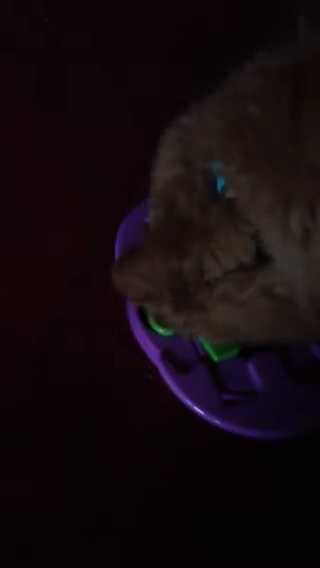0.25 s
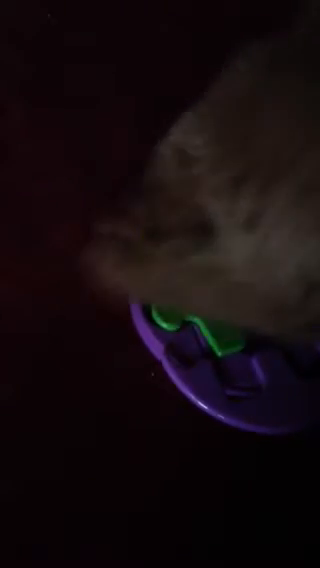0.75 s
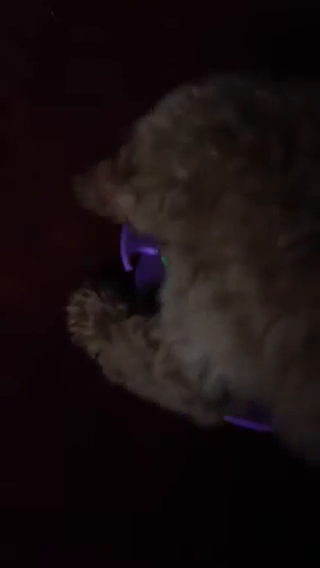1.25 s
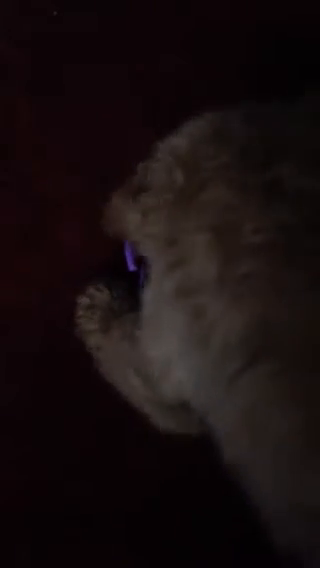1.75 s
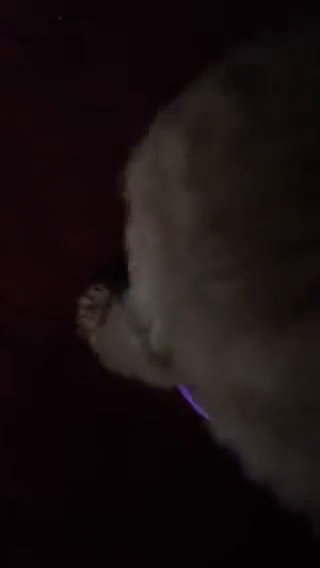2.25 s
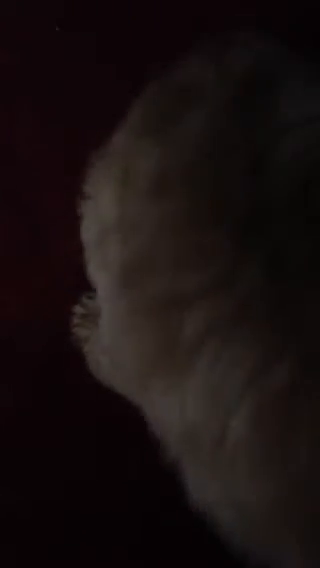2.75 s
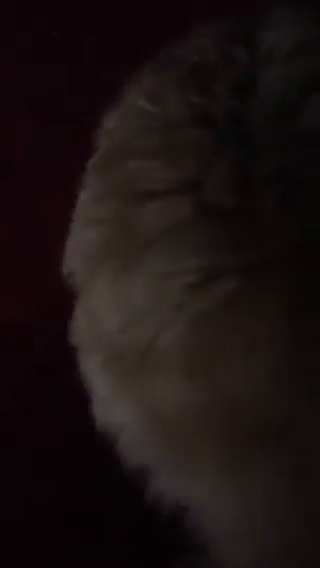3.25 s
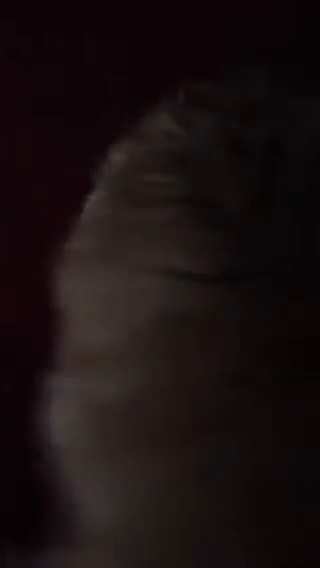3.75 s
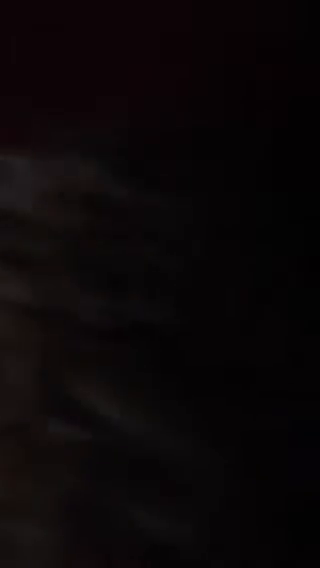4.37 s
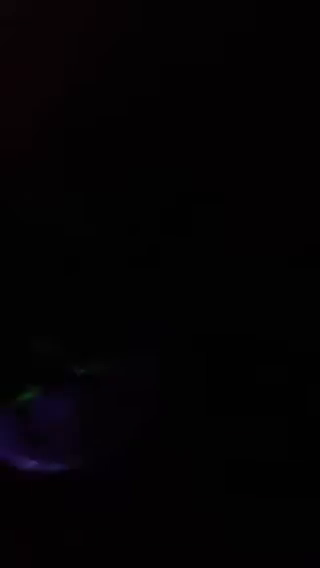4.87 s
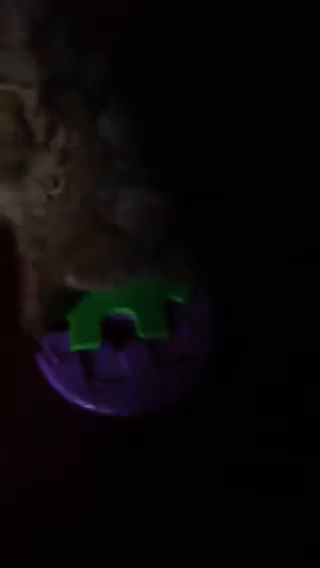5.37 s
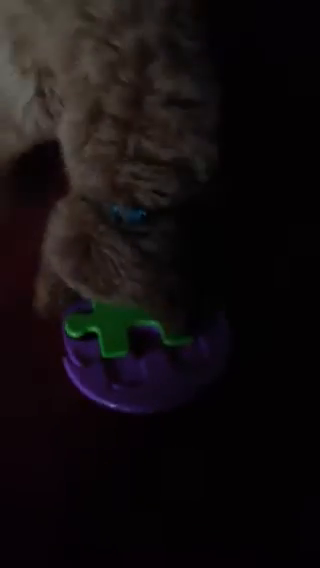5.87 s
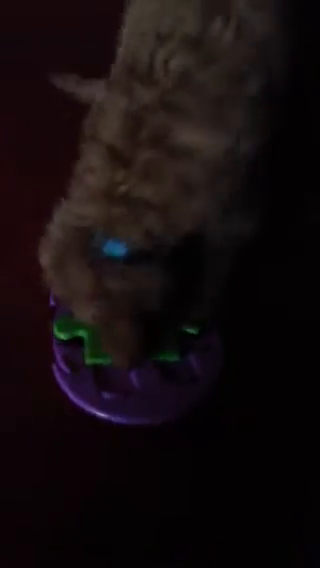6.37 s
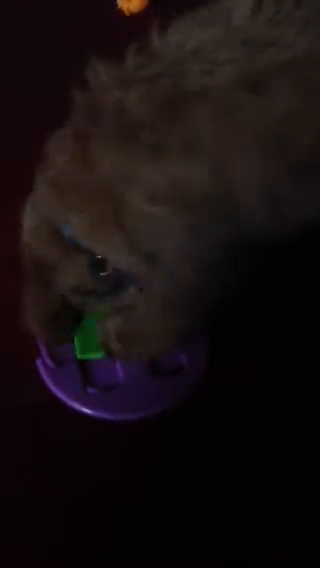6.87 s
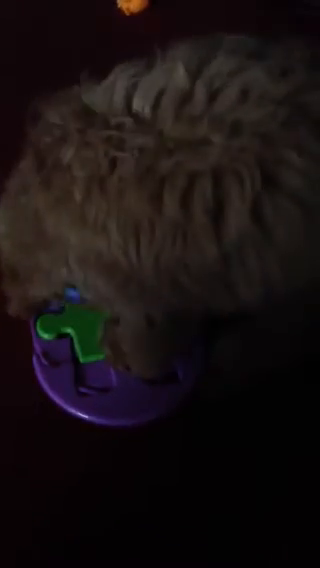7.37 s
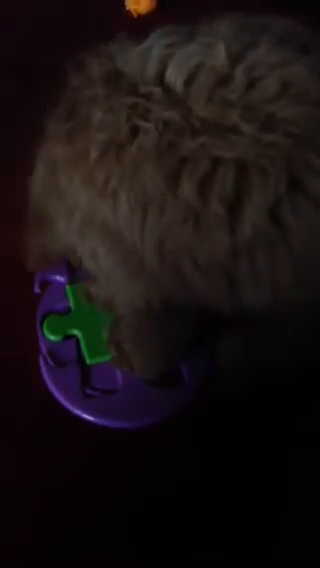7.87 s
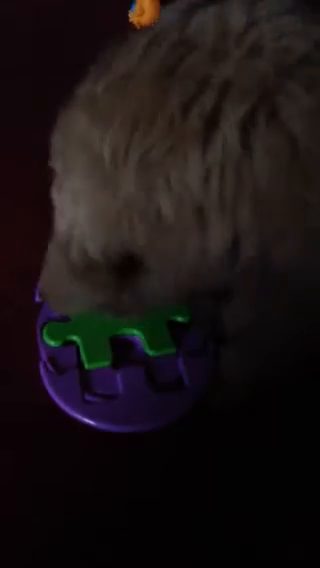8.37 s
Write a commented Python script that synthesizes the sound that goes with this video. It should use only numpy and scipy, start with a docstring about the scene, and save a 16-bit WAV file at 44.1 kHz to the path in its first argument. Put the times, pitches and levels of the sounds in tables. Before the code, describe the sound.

Hollow plastic clacks and sliding rattles come in a busy burst, then thin out to separate sharp clicks, with soft sniffs and paw thuds.

```python
"""Two faint rubbing squeaks open the scene, then soft knocks, a paw thud and a sniff, over room air and mains hum.
A dog noses and paws a hollow plastic puzzle toy on a carpet in a quiet room, near a phone.
Loose pieces knock, rattle and slide: noise contacts and slip grains ring the modes of one plastic tray.
Squeaks are noise in a narrow resonance, sniffs are coloured air noise, tag and paws are decaying sines.
A short echo surrounds the toy; deep bass is thin, treble much weaker above 15.4 kHz and absent above 16.5 kHz."""
import sys
import numpy as np
from scipy import signal
from scipy.fft import rfft, irfft, next_fast_len
from scipy.io import wavfile
from scipy.ndimage import uniform_filter1d

SR = 44100
rng = np.random.default_rng(int(sys.argv[2]) if len(sys.argv) > 2 else 0)


def wav_out(sig):
    """Save sig, one row per channel (or a flat mono array), as 16-bit PCM at SR to the path in sys.argv[1]."""
    wavfile.write(sys.argv[1], SR, np.round(np.clip(np.atleast_2d(sig).T, -1, 1) * 32767).astype(np.int16))


N = 380141  # samples


def gain_of(db):
    """Decibels to amplitude."""
    return 10 ** (np.asarray(db) / 20)


def evened(x):
    """Scales to rms 1."""
    return x / np.sqrt(np.mean(x ** 2) + 1e-20)


def read(points, hz):
    """Reads a spectrum on a log-frequency axis."""
    f, value = np.transpose(points)
    return np.interp(np.log(hz + 1), np.log(f + 1), value)


def add(mix, s, sound):
    """Mixes a sound in at s seconds."""
    part = mix[max(round(s * SR), 0):][:len(sound)]
    part += sound[:len(part)]


def coloured(x, points):
    """Filters by a spectrum."""
    size = next_fast_len(len(x))
    gains = gain_of(read(points, np.fft.rfftfreq(size, 1 / SR)))
    return irfft(rfft(x, size) * gains, size)[:len(x)]


def ring(x, hz, width):
    """A mode with gain near 1 at its centre and steep skirts: a narrow and a wide two-pole stage."""
    for spread in (1, 5.0):
        r = np.exp(-np.pi * width * spread / SR)
        x = signal.lfilter([1 - r, 0, r - 1], [1, -2 * r * np.cos(2 * np.pi * hz / SR), r * r], x)
    return x


def wander(per_s):
    """Slow random drift of rms 1, with per_s new targets a second."""
    steps = rng.standard_normal(round(N / SR * per_s) + 2)
    return evened(np.interp(np.arange(N) / SR * per_s, np.arange(len(steps)), steps))


def played(rows, rise, sag, fall):
    """Each row swells in, sags while held and dies away (dB per s): summed gain and gain-weighted colour."""
    t = np.arange(0, N + 64, 64) / SR
    start, hold, db, colour = np.transpose(rows)[:, :, None]
    held = np.clip(t - start, 0, hold)
    before = np.maximum(start - t, 0)
    after = np.maximum(t - start - held, 0)
    gains = gain_of(db - rise * before - sag * held - fall * after)
    total = gains.sum(axis=0)
    blend = (gains * colour).sum(axis=0) / (total + 1e-30)
    return [np.interp(np.arange(N) / SR, t, curve) for curve in (total, blend)]


# Clear knocks of pieces on the tray. Each row: start in seconds, level of the body's loudest moment in dB,
# hardness as treble in dB against the body, frequency that the struck spot favours in Hz.
KNOCKS = [(.0978, -35.5, -17, 1003), (.1188, -42, -25, 1070), (.132, -40, -34, 1000),
          (.6382, -51, -29.5, 1030), (.809, -57, -20, 1460), (.884, -34.5, -28, 1570),
          (.8986, -31.5, -7.5, 3220), (.914, -36, -8, 1390), (.9286, -31, -18, 1550),
          (.9528, -40.5, -4, 1630), (.981, -35, -15, 3150), (.9903, -44.5, -1, 3000),
          (1.0525, -42, -22, 1600), (1.0844, -42.5, -34, 1120), (1.2664, -35, -16, 1500),
          (1.284, -57, -26, 1140), (1.304, -46, 3.5, 1300), (1.3894, -26, -6, 1160),
          (1.4137, -26.5, -3, 1650), (1.4274, -20, -8.5, 2160), (1.4738, -26, 0.5, 1150),
          (1.5043, -25, -3, 1590), (1.5376, -22, -10.5, 960), (1.569, -22.5, -10, 980),
          (1.5802, -19.5, -7, 1640), (1.5953, -19, -8.5, 1690), (1.6285, -43, -18.5, 1930),
          (1.6783, -32, -28, 1100), (1.7322, -28.5, -19, 1440), (1.7828, -27.5, -3, 1460),
          (1.7965, -14, -5, 1490), (1.8681, -26.5, -10, 1700), (1.9023, -22.5, -32, 1240),
          (1.9265, -23.5, -8.5, 1220), (1.9554, -27, 2, 2080), (1.9874, -20, -5, 1490),
          (2.0032, -20, -12, 1170), (2.0139, -24, 0.5, 2720), (2.0199, -19.5, -3, 1580),
          (2.1093, -34, 1.5, 1680), (2.1226, -23.5, -42, 1560), (2.1993, -20, -50, 1480),
          (2.2205, -28, -8.5, 2020), (2.2553, -38, -15, 1260), (2.3157, -34.5, -6.5, 1020),
          (2.3436, -35, -38, 1730), (2.399, -24, -6.5, 3220), (2.4392, -25.5, -38, 1560),
          (2.4749, -35, -16, 1470), (2.6314, -33.5, -23, 1040), (2.666, -31, -9, 960),
          (2.677, -32, -26, 1350), (2.7802, -27.5, -22.5, 1200), (2.827, -37, -32, 1450),
          (2.8402, -39.5, -32, 1520), (2.855, -35.5, -14, 930), (2.8954, -36, -30.5, 1560),
          (2.9159, -30.5, -31, 1240), (2.939, -18, 2, 2270), (2.9644, -36, -4, 1780),
          (3.283, -45.5, -21, 1500), (3.2906, -39, -4.5, 4460), (3.3924, -34.5, -9.5, 1700),
          (3.4546, -27.5, -16.5, 794), (3.48, -26.5, -27.5, 1460), (3.4895, -22.5, -2.5, 1230),
          (3.5141, -14.5, -5.5, 1560), (3.5534, -32.5, 2.5, 2120), (3.5796, -27, -5, 860),
          (3.605, -29.5, -26, 1700), (3.7037, -45.5, -26, 860), (3.72, -44, -35, 990),
          (3.7342, -35, -13, 1190), (3.819, -37, -33, 1440), (3.8337, -31, -14, 1320),
          (3.8904, -26, -1, 3790), (3.9272, -26, -3, 1400), (3.9985, -34.5, -13, 1450),
          (4.0429, -38, -21, 1310), (4.0515, -33, -11, 1370), (4.0816, -38, -15.5, 1670),
          (4.655, -46, -19, 1518), (4.697, -44.5, -21.5, 1410), (4.9652, -34.5, -13, 1240),
          (5.1457, -35, -30.5, 1050), (5.1692, -34.5, -28, 1190), (5.1941, -13, -3, 1910),
          (5.2073, -15, -4.5, 1890), (5.24, -20.5, -29, 1610), (5.2496, -18.5, -3, 2010),
          (5.2742, -35, -11, 2040), (5.2917, -30, -9, 1500), (5.4507, -43, -14, 1630),
          (5.4759, -43.5, -28, 1040), (5.588, -37, -16, 1740), (5.6918, -51, -6.5, 1970),
          (5.8035, -36, -5.5, 1330), (5.8329, -25, -1.5, 1360), (5.8511, -30.5, -19, 1510),
          (5.9241, -21.5, -5, 1340), (5.9414, -34, -16, 1300), (5.9797, -37, -30, 1230),
          (6.01, -41.5, -12, 1510), (6.2434, -52, -31.5, 750), (6.3613, -41, -12, 1260),
          (6.403, -31.5, -8, 1470), (6.425, -42, -3.5, 1400), (6.44, -43, -33, 1500),
          (6.5752, -28.5, -49, 1600), (6.5964, -34.5, -17, 1410), (6.6192, -36, 1.5, 1520),
          (6.6971, -27, 2.5, 3840), (6.7055, -23.5, 1.5, 1180), (6.7225, -16, -3, 2010),
          (6.7658, -28, -8.5, 1260), (6.7865, -35.5, -24, 1260), (6.8752, -37, -50, 1670),
          (7.0208, -47, -26.5, 1690), (7.137, -32.5, -1, 2260), (7.1529, -11, -2.5, 2180),
          (7.171, -32, -12.5, 3900), (7.312, -52, -5, 900), (7.547, -52, -20, 800),
          (7.556, -38, -30.5, 1270), (7.577, -39, -28, 1590), (7.649, -51, -30.5, 1750),
          (7.68, -54, -17.5, 2056), (7.829, -53.5, -19.5, 972), (7.952, -54.5, -10.5, 1335),
          (8.0621, -39.5, 3, 1648), (8.109, -41.5, -1.5, 1160), (8.1662, -50, -17, 3110),
          (8.2118, -20, -7, 1400), (8.2575, -22, -8, 1740), (8.2946, -28, -35, 1660),
          (8.3249, -36, -12, 1680), (8.3384, -38, -2, 1300), (8.3512, -42, 7, 970), (8.372, -37, -6, 1300),
          (8.4245, -45, -18, 3120), (8.467, -46, -10.5, 3060)]
# Resonances of the plastic tray, lowest first. Each row: frequency in Hz, width in Hz, level in dB.
TRAY_MODES = [(478, 140, 0), (687, 450, 5.5), (900, 330, -0.5), (1120, 230, 4.5), (1300, 200, 4),
              (1450, 120, 3), (1640, 352, 4), (1970, 200, -6.5), (2192, 460, -2.5), (2560, 220, -10),
              (2804, 460, -2.5), (3137, 250, -4.5), (3563, 430, -8.5), (4470, 130, -13), (5030, 270, -14.5)]
# Treble spectrum of a hard contact. Each row: frequency in Hz, level in dB per Hz.
CRACK = [(2350, -27), (4000, 4), (7090, -3.5), (8770, -8.5), (9410, -8), (12900, -10.5), (14600, -15.5),
         (16400, -28)]
WEIGHT_DB = -13.5  # bass of a knock against its body, for a spot at 1400 Hz
WEIGHT_DB_PER_OCTAVE, WEIGHT_SPREAD_DB = -4, 2.5  # low spots sound heavier


def knocks(rows):
    """Each knock is a quick chatter of contacts that rings the tray where it lands."""
    out, t = np.zeros(N), np.arange(2048) / SR
    for s, db, hard_db, spot_hz in rows:
        if db < -62:  # too faint to hear
            continue
        chatter_s = 0.0046 * gain_of(0.14 * (db + 29.5))  # stronger blows chatter longer
        contacts = rng.standard_normal(len(t)) * gain_of(6.1 * rng.standard_normal(len(t)))
        contacts *= np.minimum(t / (0.17 * chatter_s), 1) * np.exp(-t / chatter_s)
        luck_db = 2 * rng.standard_normal(len(TRAY_MODES))
        heavy_db = WEIGHT_DB + WEIGHT_DB_PER_OCTAVE * np.log2(spot_hz / 1400)
        heavy_db += WEIGHT_SPREAD_DB * rng.standard_normal()

        # modes near the struck spot are driven hardest; a strong blow shakes more of the tray
        focus_db = np.clip(5.5 - 0.16 * (db + 19.5), 2, 14)  # per octave
        octaves = abs(np.log2(np.transpose(TRAY_MODES)[0, 1:] / spot_hz))
        # a light tap sings on the nearest mode
        nearest_db = np.clip(-.25 * (db + 10), 0, 7) * (octaves == octaves.min())
        body = np.zeros(len(t))
        for (hz, width, mode_db), luck, octave, near in zip(TRAY_MODES[1:], luck_db, octaves, nearest_db):
            body += gain_of(mode_db + luck - focus_db * octave + near) * ring(contacts, hz, width)

        crack = coloured(contacts, CRACK)
        weight = ring(contacts, *TRAY_MODES[0][:2])
        for part, part_db in ((body, 0), (crack, hard_db), (weight, heavy_db)):
            loudest = np.sqrt(uniform_filter1d(part ** 2, size=110).max() * 2)
            add(out, s, gain_of(db + part_db) * part / loudest)
    return out


# Pieces scraping over the tray, and among them a few very faint rustles. Each row: start in seconds,
# hold in seconds, scraping level at the start in dB, treble in dB against it.
SCRAPES = [(.11, 0.036, -57, -29), (.885, 0.1, -45.5, -31), (1.272, 0.014, -44.5, -26),
           (1.39, 0.12, -29.5, -27), (1.52, 0.12, -29, -37), (1.74, 0.034, -37.5, -13.5),
           (1.79, 0.085, -33.5, -37), (1.89, 0.26, -29.5, -15), (2.11, 0.036, -37.5, -7.5),
           (2.2, 0.067, -35, -8), (2.32, 0.038, -38, -36), (2.41, 0.034, -29.5, -54),
           (2.63, 0.076, -42, -34), (2.78, 0.19, -50.5, -14.5), (2.912, 0.025, -34.5, -10),
           (2.94, 0.013, -32, -2), (3.29, 0.0073, -57, -32), (3.457, 0.04, -44, -25),
           (3.495, 0.063, -27.5, -10), (3.73, 0.015, -45, -32), (3.82, 0.41, -48.5, -20),
           (4.66, 0.076, -70, -25.5), (4.97, .005, -54, -32), (5.15, .04, -47, -8), (5.2, 0.054, -40.5, -4),
           (5.4, 0.59, -57, -28), (5.68, 0.16, -71.5, -14.5), (5.836, 0.026, -42, -15),
           (5.93, 0.011, -37.5, -24), (6.24, 0.16, -65.5, -13), (6.36, 0.099, -53.5, -37),
           (6.58, 0.037, -46.5, -28), (6.706, 0.035, -34.5, -17), (6.83, 0.067, -61, -14),
           (7.02, 0.09, -65, -16.5), (7.155, 0.0075, -34.5, -25), (7.27, 0.16, -62, -11),
           (7.56, 0.027, -53, -23), (8.06, 0.074, -61, -18), (8.212, 0.071, -36, -49),
           (8.33, 0.023, -33, -28.5), (8.43, 0.33, -55, -11)]
SCRAPE_RISE, SCRAPE_SAG, SCRAPE_FALL = 2500, 50, 367  # dB per s before, during and after the hold


def drags():
    """Stick and slip: uneven grains, in clumps, ring the same tray."""
    gain, treble_db = played(SCRAPES, SCRAPE_RISE, SCRAPE_SAG, SCRAPE_FALL)
    grains = gain_of(3.0 * np.minimum(rng.exponential(1, N), 3.5)) * rng.choice([-1., 1.], N)
    grains *= rng.random(N) < 2500 / SR  # about 2500 slips a second
    grains = evened(grains * gain_of(3.4 * wander(120)))
    # the sliding contact visits one mode after another
    body = np.zeros(N)
    for hz, width, db in TRAY_MODES:
        visit = gain_of(db + 2.5 * np.log2(hz / 1500) + 4.1 * wander(60))
        body += ring(visit * grains, hz, width)
    treble = evened(coloured(grains, CRACK))
    return gain * (evened(body) + gain_of(treble_db) * treble)


RATTLE_PER_S = 26
RATTLE_DB, RATTLE_SPREAD_DB = -3.5, 6  # small knocks, against the scraping level
RATTLE_HARD_DB, RATTLE_HZ = -16.5, 1400  # typical treble against the body, and favoured spot


def rattle():
    """Rows of small knocks at random moments, their strength following the scraping level."""
    slots = np.arange(int(N / SR * RATTLE_PER_S))
    s = (slots + rng.random(len(slots))) / RATTLE_PER_S
    size, hard, spot = rng.standard_normal((len(slots), 3)).T
    scrape = played(SCRAPES, SCRAPE_RISE, SCRAPE_SAG, SCRAPE_FALL)[0]
    scrape_db = 20 * np.log10(scrape[(s * SR).astype(int)] + 1e-9)
    level_db = scrape_db + RATTLE_DB + RATTLE_SPREAD_DB * size
    return np.transpose([s, level_db, RATTLE_HARD_DB + 7.0 * hard, RATTLE_HZ * 2 ** (0.29 * spot)])


# A rubbed piece sings briefly on one note. Each row: start in seconds, length in seconds,
# rms level in dB before the ends are faded, frequency in Hz.
SQUEAKS = [(0, 0.036, -64, 1000), (0, 0.04, -64, 2400), (0.206, 0.074, -61, 1450),
           (.89, 0.043, -47.5, 3200), (0.978, .03, -49, 3130), (1.148, 0.053, -53.5, 1600),
           (2.992, 0.031, -47, 1570), (5.857, 0.078, -51, 1400), (8.255, 0.025, -36, 1690)]
SQUEAK_WIDTH_HZ = 120


def squeaks():
    """Friction noise held by one narrow resonance."""
    out = np.zeros(N)
    for s, length, db, hz in SQUEAKS:
        rub = rng.standard_normal(round(length * SR))
        note = evened(ring(rub, hz, SQUEAK_WIDTH_HZ))
        add(out, s, gain_of(db) * note * signal.windows.tukey(len(rub), .5))
    return out


# Air through the dog's nose. Each row: start in seconds, hold in seconds, level at the start in dB,
# dullness as dB lost per octave above 3 kHz.
SNIFFS = [(.135, 0.12, -55, -0.5), (.41, 0.027, -82.5, 13), (.72, 0.047, -68.5, 6), (1.13, 0.42, -60, 0),
          (4.43, 0.093, -76.5, -4), (4.69, 0.024, -56, -1), (5.34, 0.34, -64, -3.5),
          (8.49, 0.063, -58.5, -1)]
# Spectrum of the nose air. Each row: frequency in Hz, level in dB per Hz.
NOSTRILS = [(290, -34), (500, -10.5), (827, -10), (901, -3.5), (1560, 0), (2100, -15.5), (2290, -11),
            (4130, -10.5), (15500, -24)]
SNIFF_RISE, SNIFF_SAG, SNIFF_FALL = 360, 23, 800  # dB per s before, during and after the hold


def sniffs():
    """Turbulent air, slightly fluttering; a nose turned into the toy sounds duller."""
    gain, dull = played(SNIFFS, SNIFF_RISE, SNIFF_SAG, SNIFF_FALL)
    air = evened(coloured(rng.standard_normal(N), NOSTRILS) * gain_of(3.7 * wander(48)))
    hz, t, z = signal.stft(air, SR, nperseg=256)
    octaves = np.log2(np.maximum(hz, 3000) / 5000)[:, None]  # the tilt pivots at 5 kHz
    z = z * gain_of(-octaves * dull[np.minimum((t * SR).astype(int), N - 1)])
    return gain * signal.istft(z, SR, nperseg=256)[1][:N]


# Modes of the metal tag. Each row: frequency in Hz, level in dB, time to fall 60 dB in seconds.
TAG_MODES = [(8500, -9, .06), (10330, -8, .047), (11775, -5.5, .088), (15085, -2.5, .061)]
# The tag swings against its ring. Each row: start in seconds, level in dB before the mode levels,
# frequency that the touch favours in Hz.
TINKLES = [(0.777, -58, 10300), (1.022, -55, 10400), (5.843, -36, 9800), (6.611, -36.5, 15000),
           (6.62, -18.5, 12800), (6.623, -30, 13000)]


def tag():
    """Thin metal: a few clean high modes, weaker the further they lie from the favoured frequency."""
    out, t = np.zeros(N), np.arange(8000) / SR
    for s, db, spot_hz in TINKLES:
        for hz, mode_db, t60 in TAG_MODES:
            off_spot_db = 22.0 * abs(np.log2(hz / spot_hz))
            level = gain_of(db + mode_db - off_spot_db - 60 * t / t60)
            add(out, s, level * np.sin(2 * np.pi * hz * t) * np.minimum(t / 0.0017, 1))
    return out


# Paws landing on the carpet. Each row: start in seconds, level at the start of the decay in dB,
# frequency in Hz, time to fall 60 dB in seconds.
THUDS = [(0.094, -40, 132, 0.044), (0.884, -40, 158, 0.042), (1.038, -47, 101, 0.07),
         (1.118, -50.5, 100, 0.14), (1.383, -32, 163, 0.047), (1.795, -36, 180, 0.1),
         (2.311, -36.5, 197, 0.075), (3.455, -50.5, 171, 0.56), (5.192, -37.5, 198, 0.1),
         (5.554, -40.5, 151, 0.11), (6.713, -29, 208, 0.071), (6.952, -31.5, 294, 0.03),
         (6.953, -32.5, 80, 0.077), (6.973, -29, 94, 0.11), (7.144, -44, 209, 0.076),
         (8.217, -41, 206, 0.1)]


def paws():
    """Soft low pushes into the floor: decaying sines with a short rise."""
    out, t = np.zeros(N), np.arange(9000) / SR
    for s, db, hz, t60 in THUDS:
        level = gain_of(db - 60 * t / t60)
        add(out, s, level * np.sin(2 * np.pi * hz * t) * np.minimum(t / 0.0013, 1))
    return out


# Decay of the room echo. Each row: frequency in Hz, time to fall 60 dB in seconds.
ROOM_DECAY = [(200, .2), (1000, 0.18), (4000, 0.19), (12000, 0.19)]
ROOM_DB = -12  # echo against the near sound


def room(x):
    """Sparse taps of random sign, each band dying at its own speed."""
    taps = np.zeros(SR // 2)
    at = np.arange(200, len(taps) - 20, 20)
    taps[at + rng.integers(0, 20, len(at))] = rng.choice([-1., 1.], len(at))
    hz, t, z = signal.stft(taps, SR, nperseg=256)
    decay = gain_of(-60 * t / read(ROOM_DECAY, hz)[:, None])
    tail = signal.istft(z * decay, SR, nperseg=256)[1]
    return signal.oaconvolve(x, tail / np.linalg.norm(tail))[:N]


# Spectrum of room air and microphone hiss. Each row: frequency in Hz, level in dB per Hz.
AIR = [(15, -37), (25, -14.5), (48, -7), (68, -8.5), (127, -5), (166, -9.5), (249, -13), (317, -20),
       (405, -16), (677, -22.5), (1100, -24.5), (2160, -30), (8360, -36.5), (14800, -41.5), (16000, -51.5)]
AIR_DB = -64.5  # rms, around which it drifts
HUM_HZ, HUM_DB = 58.5, -60  # centre pitch and peak level, around which both waver


def background():
    """Still room air and microphone hiss as coloured noise, with a wavering mains hum as one sine."""
    air = evened(coloured(rng.standard_normal(N), AIR)) * gain_of(AIR_DB + 1.8 * wander(4))
    hum_level = gain_of(HUM_DB + 1.6 * wander(4.4))
    hum_hz = HUM_HZ + 0.89 * wander(5.1)
    return air + hum_level * np.sin(2 * np.pi * np.cumsum(hum_hz) / SR)


def scene():
    """Everything near the toy, its echo in the room, and the background."""
    toy = knocks(KNOCKS) + knocks(rattle()) + drags() + squeaks()
    near = toy + sniffs() + tag() + paws()
    return (near + gain_of(ROOM_DB) * room(near) + background())[None]


BASS_HZ = 46.5  # bass is weaker below this
DULL_HZ, DULL_DB = 15400, -22  # treble above this is weaker by this much
EDGE_HZ = 16500  # the band ends here


def record(dry):
    """Deep bass is thin, the top of the treble is much weaker, then the band ends."""
    dry = signal.sosfilt(signal.butter(3, BASS_HZ, "high", fs=SR, output="sos"), dry)
    below, whole = (signal.firwin(401, hz, window=("kaiser", 9), fs=SR) for hz in (DULL_HZ, EDGE_HZ))
    response = below + gain_of(DULL_DB) * (whole - below)
    return signal.oaconvolve(dry, response[None], "same")


dry = scene()
out = record(dry)
wav_out(out)
```